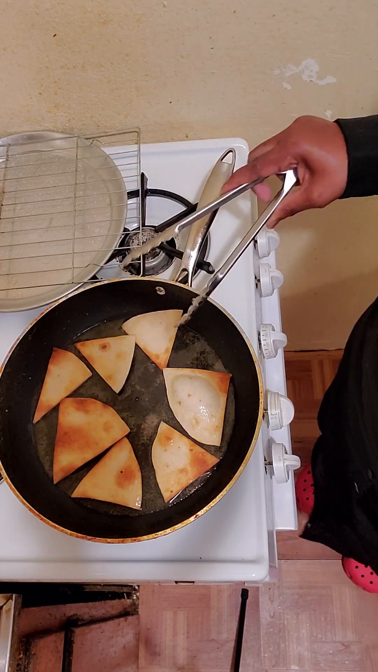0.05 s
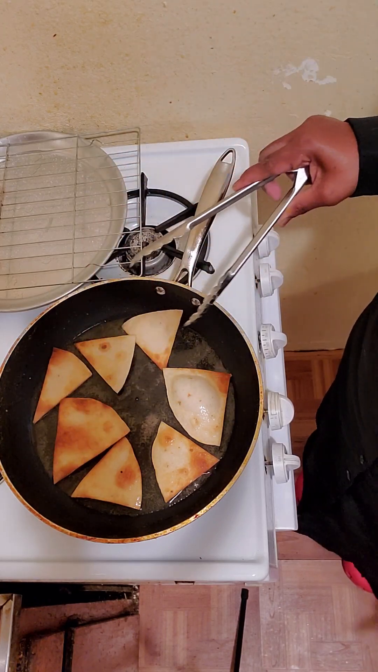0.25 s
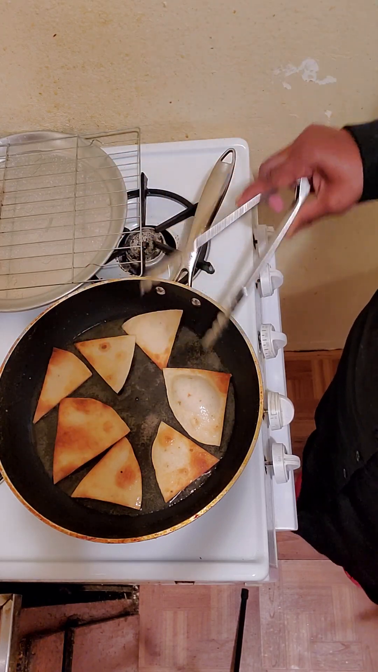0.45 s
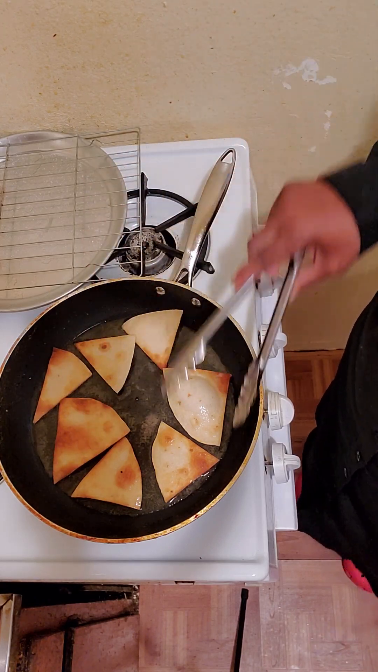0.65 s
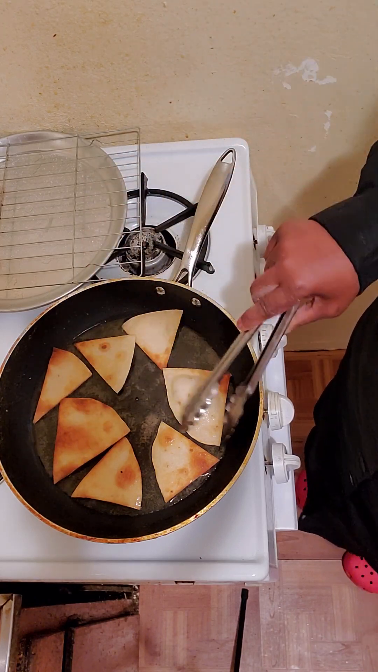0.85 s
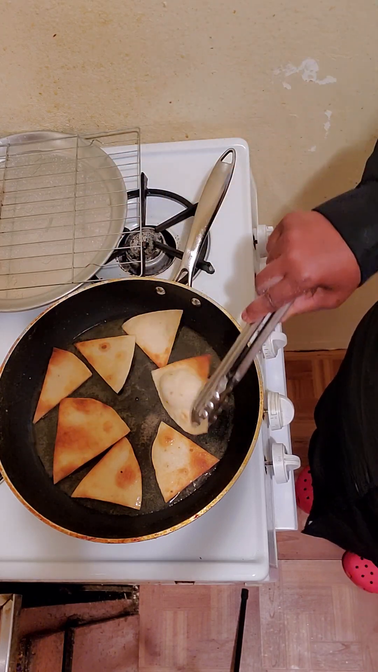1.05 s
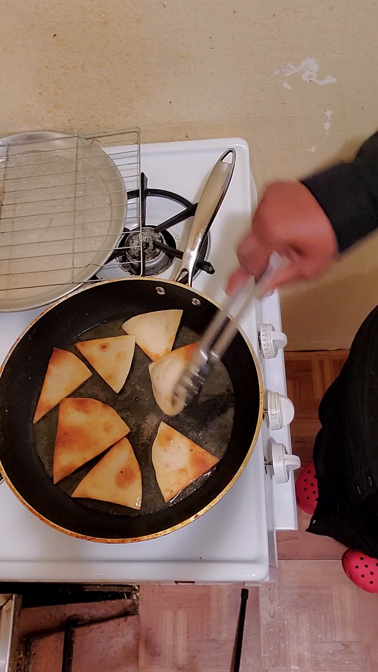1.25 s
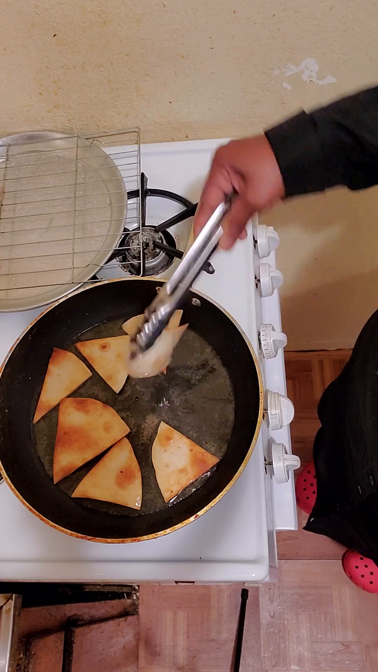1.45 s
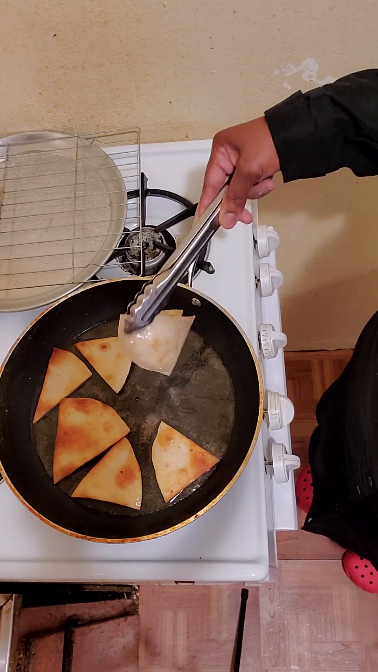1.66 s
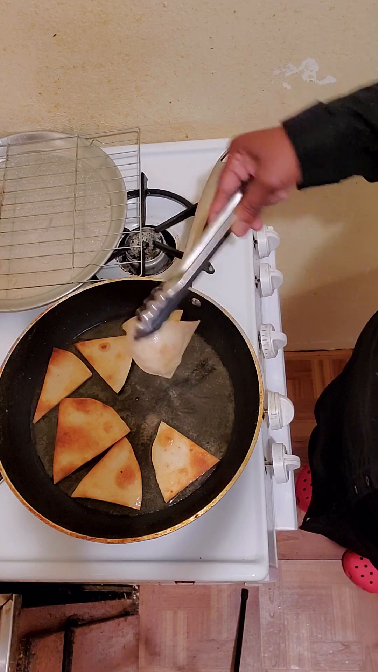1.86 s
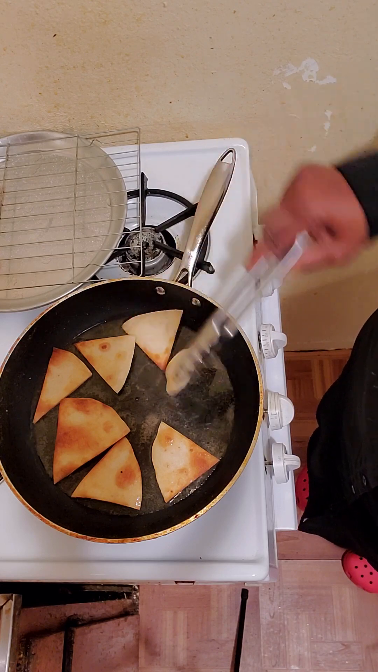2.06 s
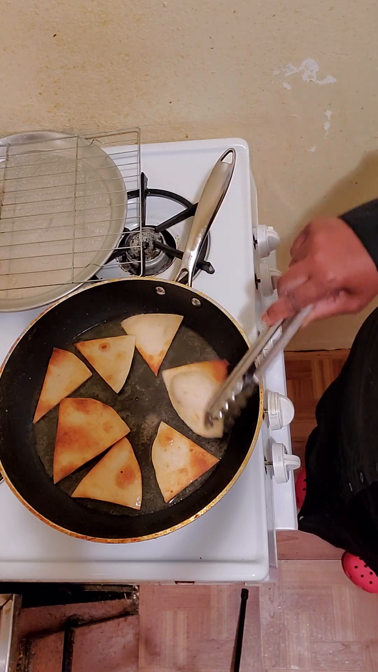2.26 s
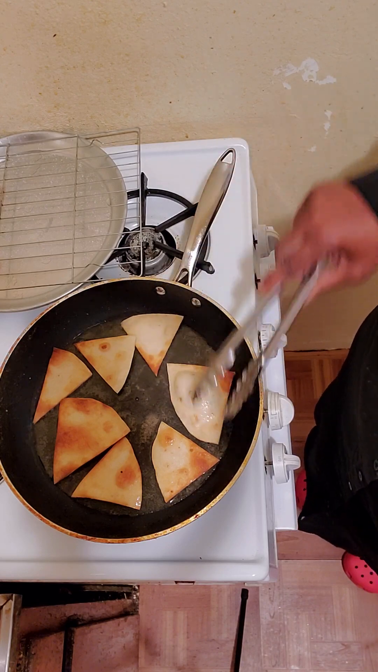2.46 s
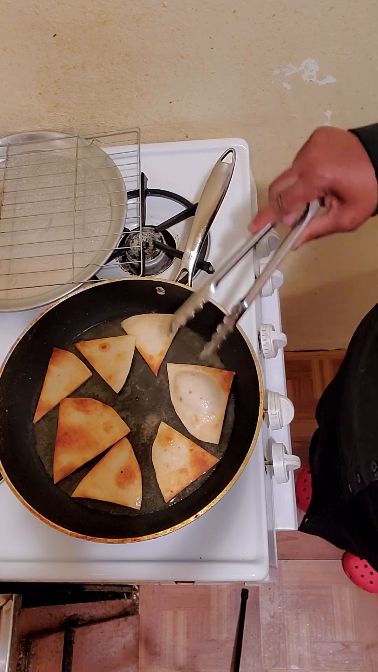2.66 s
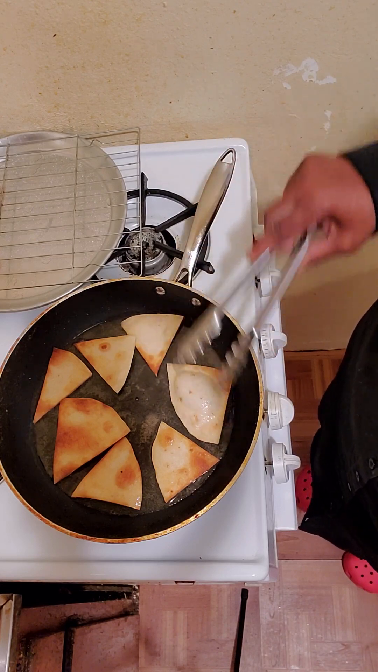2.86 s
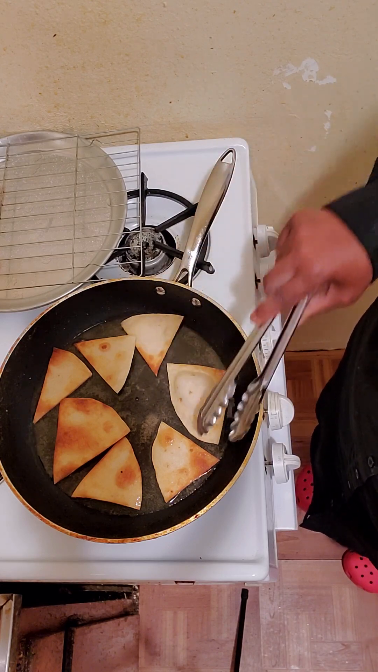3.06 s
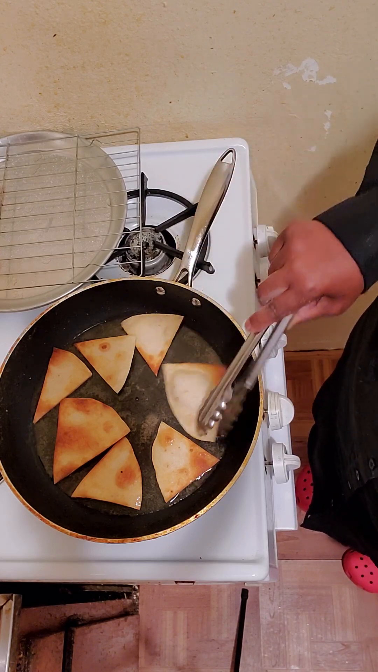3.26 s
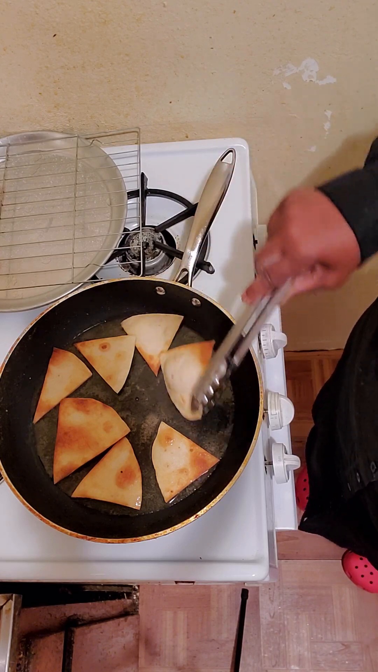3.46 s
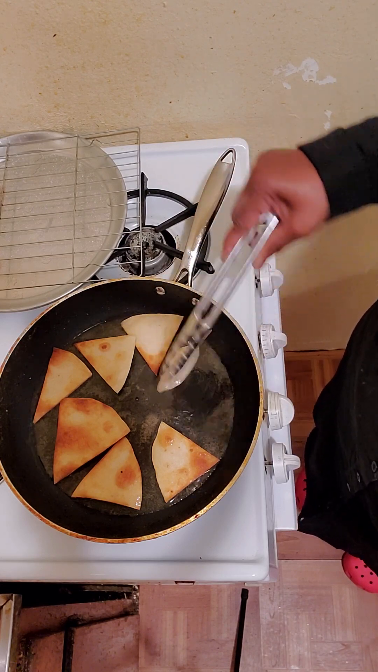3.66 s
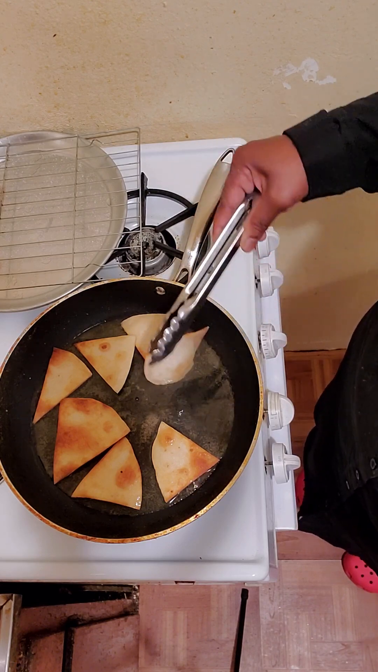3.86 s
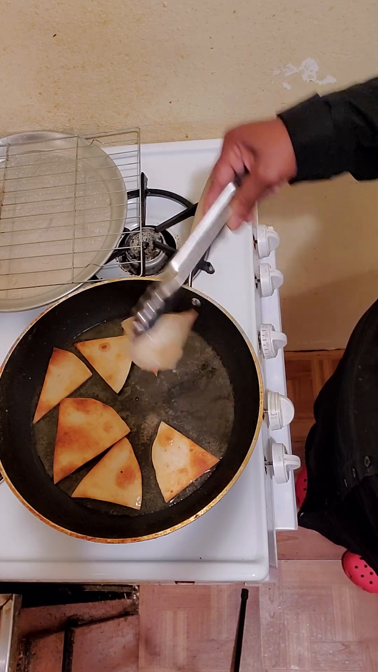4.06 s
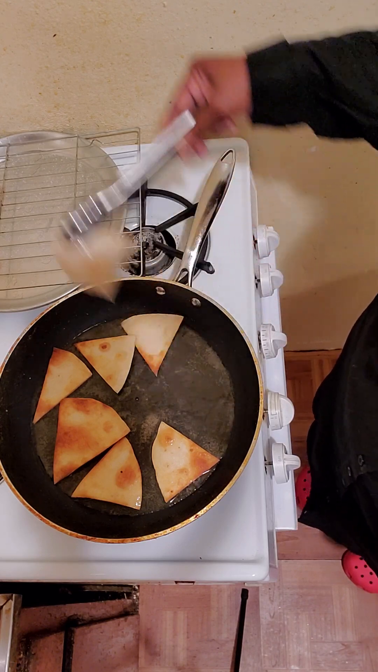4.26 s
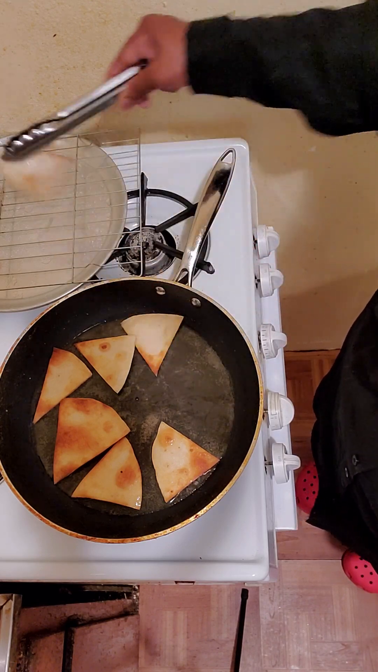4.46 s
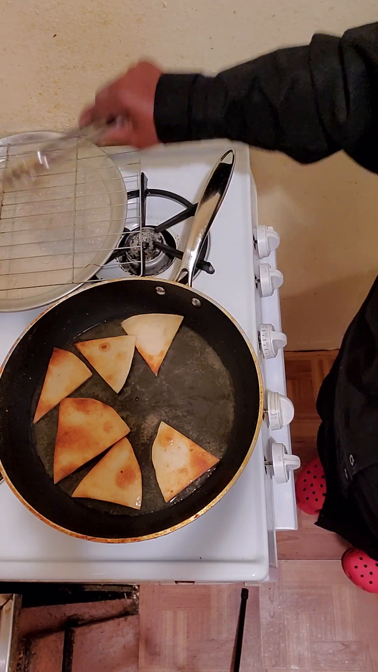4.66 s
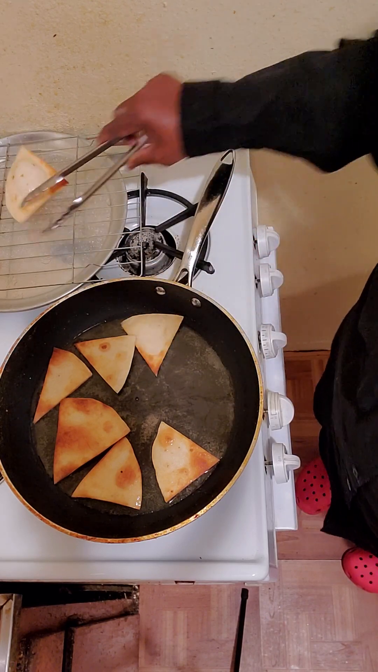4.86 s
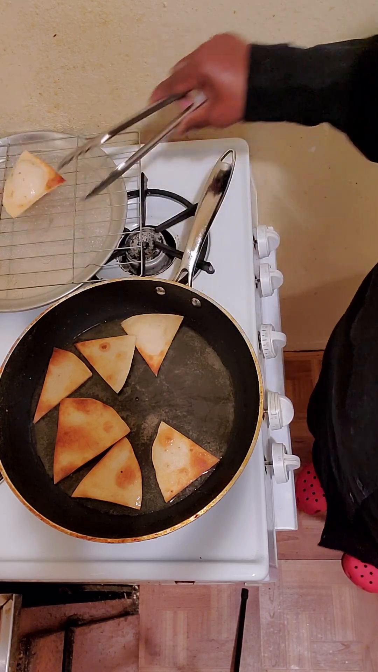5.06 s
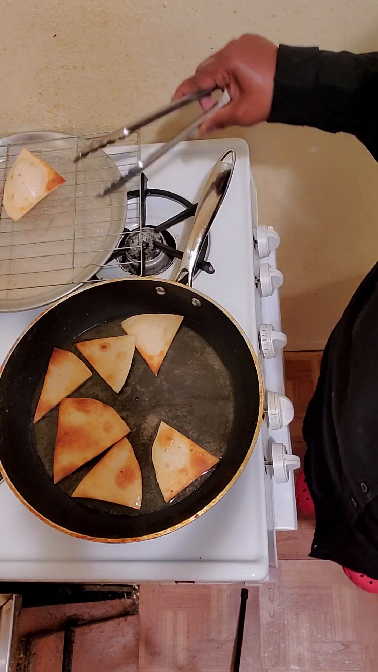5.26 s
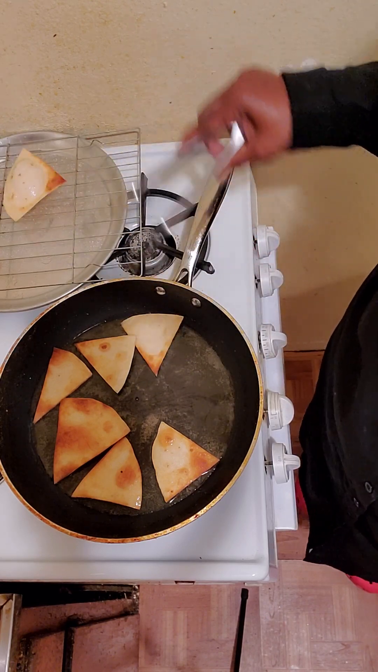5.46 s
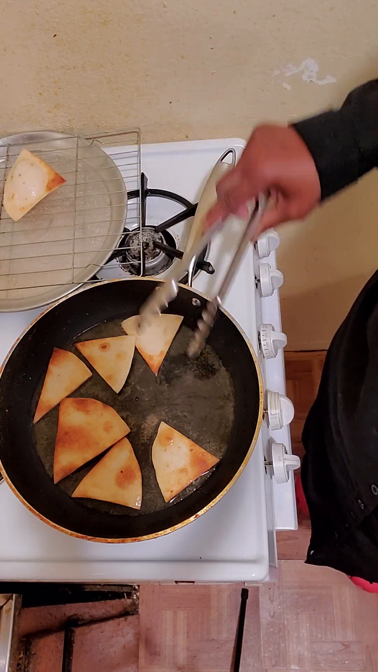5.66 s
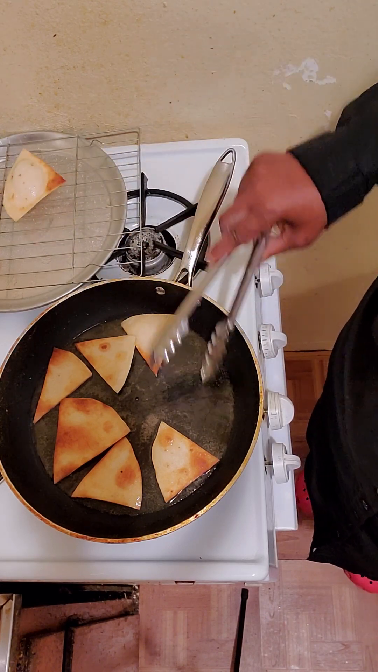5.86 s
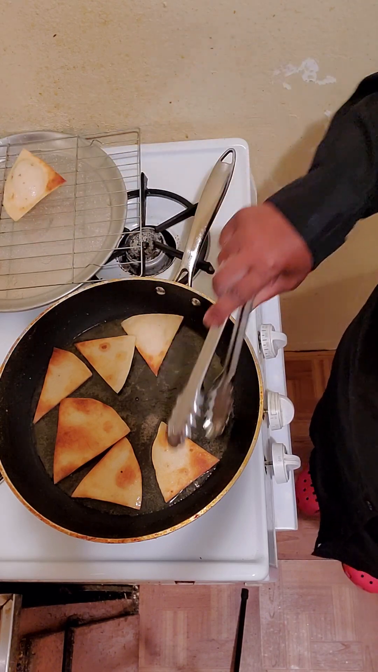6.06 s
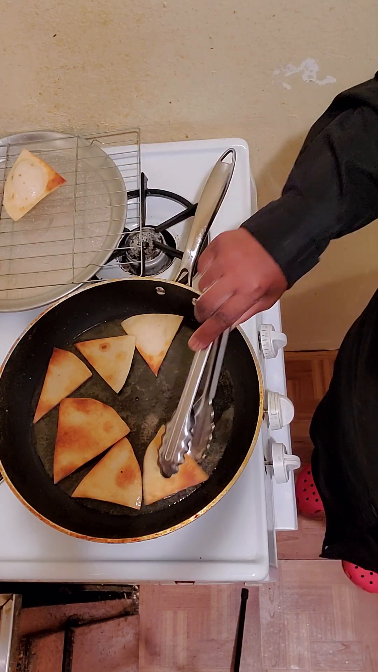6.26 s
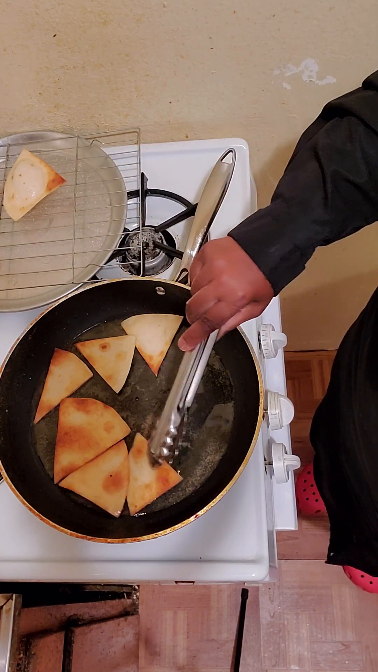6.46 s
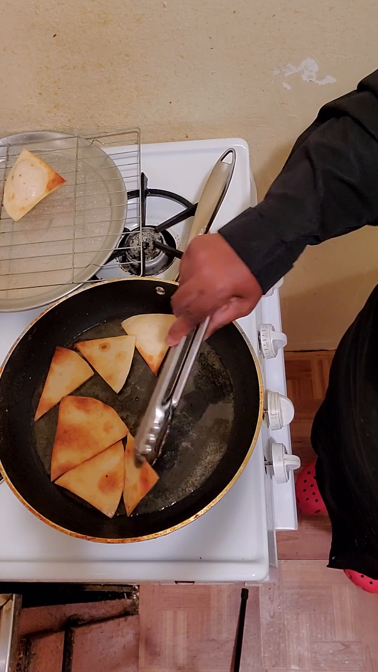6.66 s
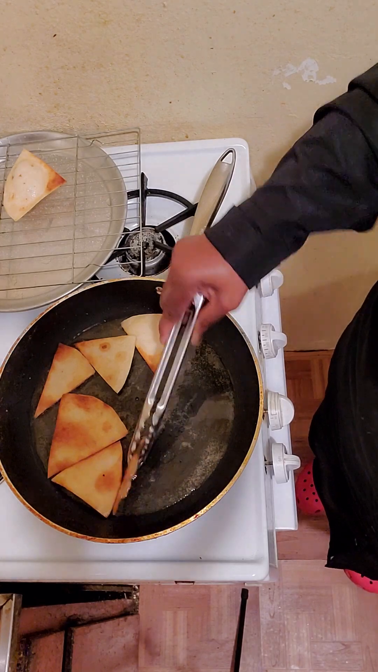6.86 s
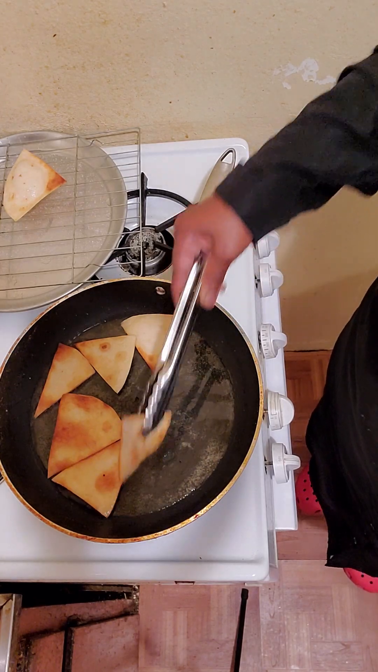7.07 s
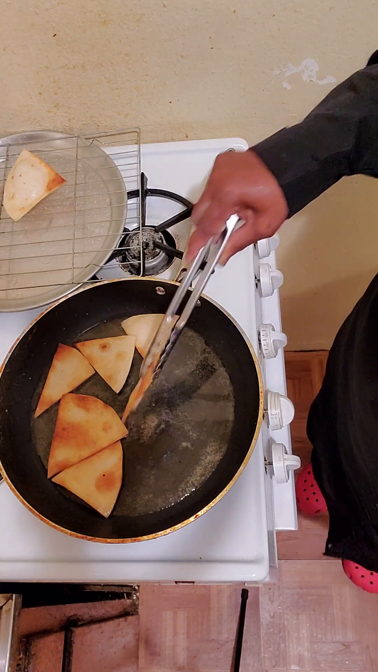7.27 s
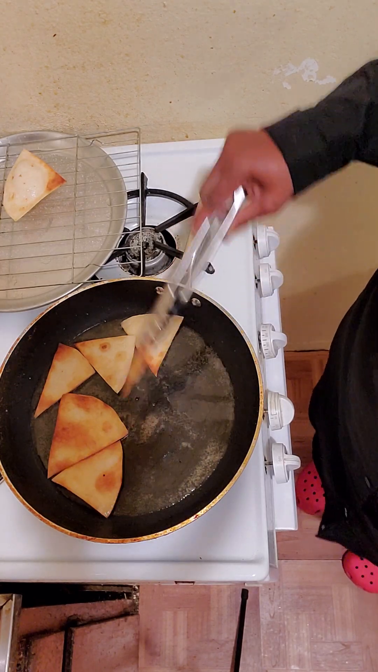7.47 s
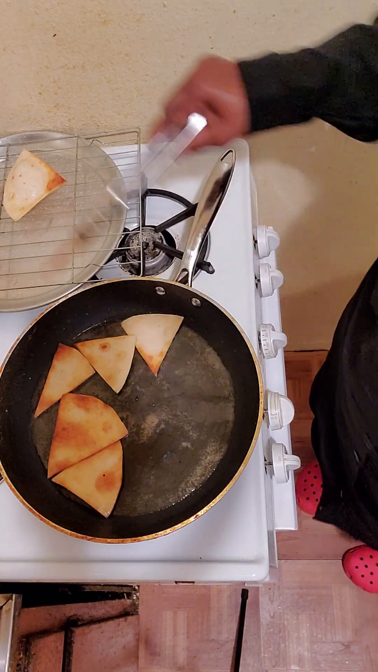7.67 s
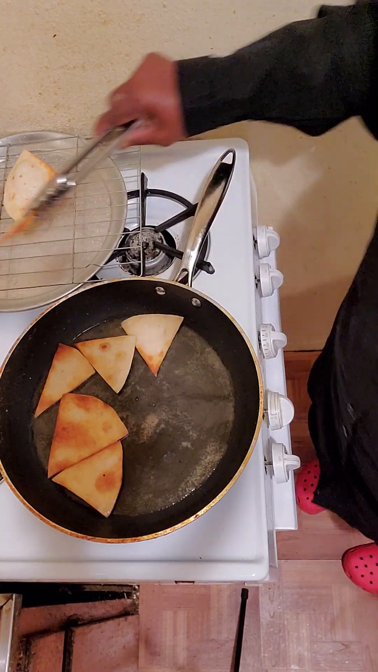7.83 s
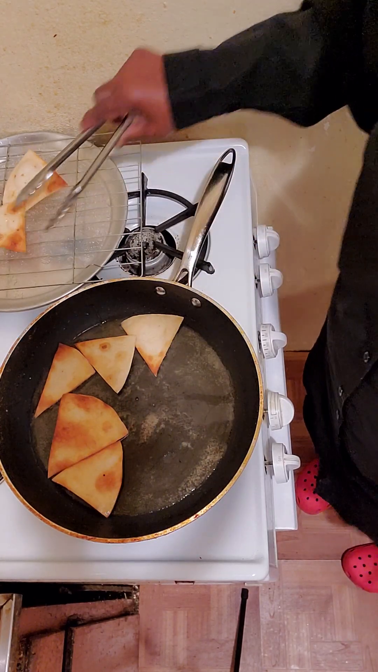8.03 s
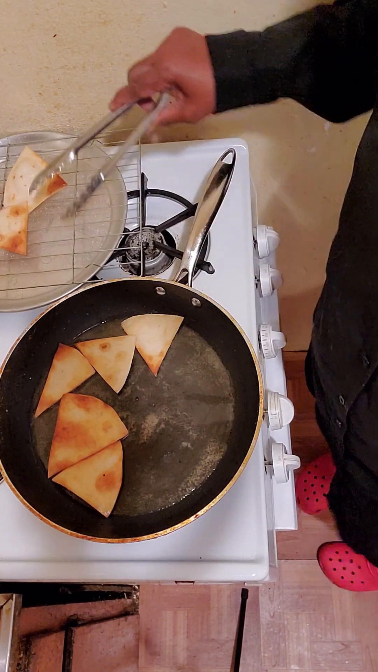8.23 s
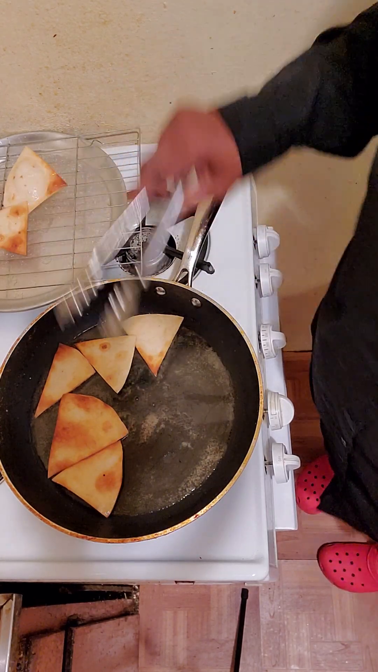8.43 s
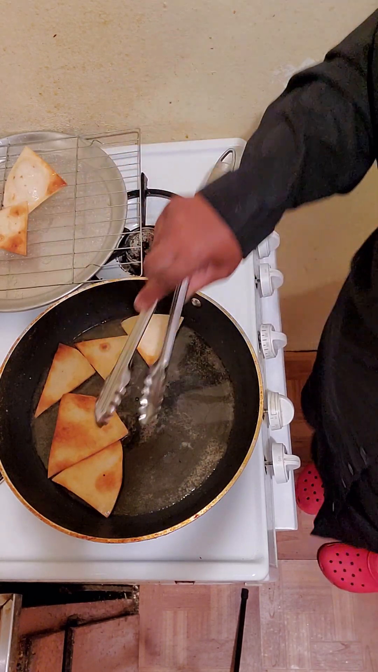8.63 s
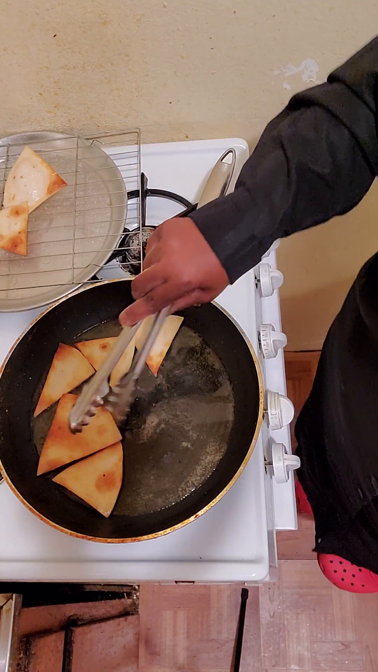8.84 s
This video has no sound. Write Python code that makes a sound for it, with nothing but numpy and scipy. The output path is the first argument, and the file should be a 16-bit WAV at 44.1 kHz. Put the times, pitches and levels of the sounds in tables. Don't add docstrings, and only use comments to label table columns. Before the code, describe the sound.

Metal tongs tap a ringing frying pan over a faint oil fizz, then crisp food lands with a rattle on a wire rack.

```python
import sys
import numpy as np
from scipy import signal
from scipy.fft import rfft, irfft, next_fast_len
from scipy.io import wavfile
from scipy.ndimage import uniform_filter1d

SR = 44100
rng = np.random.default_rng(int(sys.argv[2]) if len(sys.argv) > 2 else 0)


def convert_level_to_amplitude(level_db):
    exponent = np.asarray(level_db, float) / 20
    return 10 ** exponent


def file_out(sig):
    cols = np.atleast_2d(sig).T
    lim = np.clip(cols, -1, 1)
    pcm = np.round(lim * 32767).astype(np.int16)
    wavfile.write(sys.argv[1], SR, pcm)


N = 392487
RING = 2 ** 14


def level(x, db):
    return x * convert_level_to_amplitude(db) / np.sqrt(np.mean(x ** 2))


def early(x):
    return x / np.sqrt(np.mean(x[..., :512] ** 2))


def read(table, hz):
    table_hz, value = np.transpose(table)
    return np.interp(np.log(np.maximum(hz, 1)), np.log(table_hz), value)


def colour(x, table, tilt_db=0):
    size = next_fast_len(x.shape[-1])
    hz = np.fft.rfftfreq(size, 1 / SR)
    gain_db = read(table, hz) + tilt_db * np.log2(np.maximum(hz, 500) / 4000)
    return irfft(rfft(x, size) * convert_level_to_amplitude(gain_db), size)[..., :x.shape[-1]]


def noise(size):
    return rng.standard_normal((2, size))


def fade(t60, size=RING):
    return 1000. ** (-np.arange(size) / SR / np.maximum(t60, .005))


def walk(rate):
    hold = int(SR / rate)
    steps = np.repeat(rng.standard_normal(N // hold + 1), hold)
    return 1.3 * uniform_filter1d(uniform_filter1d(steps, hold), hold)[:N]


def ring(hz, db, t60, choke_s, size=RING, waver=0, slow_hz=20000):
    hz, db, t60 = (np.asarray(v)[:, None] for v in (hz, db, t60))
    start, off = rng.random((2, len(hz)))
    side_start = start + .25 * np.sign(off - .5) + .1 * np.sin(40 * off)
    turn = np.exp(2j * np.pi * np.array([start, side_start])) * convert_level_to_amplitude(db.T)
    t = np.arange(size) / SR
    choke = 0.084 + np.exp(-(t / choke_s) ** 2 * (hz / 4000))
    build = 1 - np.exp(-hz * np.maximum(hz / slow_hz, 1) * t / 5)
    modes = np.exp((2j * np.pi * hz - np.log(1000) / t60) * t) * build * choke
    if waver:
        beat = 2 * np.pi * 29.42 * (.5 + off[:, None]) * t
        modes = modes * (1 - waver * np.sin(beat / 2 + np.sin(beat / 3)) ** 2)
    return np.pad((turn @ modes).imag, ((0, 0), (0, RING - size)))


def strike(body, contact_ms, clash_db, clash_t60, clash, tilt_db=0):
    build = 1 - np.exp(-np.arange(RING) / SR * 1000 / max(contact_ms, .1))
    grain = convert_level_to_amplitude(uniform_filter1d(rng.standard_normal(RING), size=40) * 9.0)
    blur = colour(noise(RING) * fade(clash_t60) * grain * build, clash, tilt_db)
    return np.array([early(body * build), convert_level_to_amplitude(clash_db) * early(blur)])


def add(track, s, sound, db):
    i = int(s * SR)
    track[..., i:i + RING] += (early(sound) * convert_level_to_amplitude(db - 12))[..., :N - i]


# start in seconds, peak level in dB,
# time until food and hand choke the ring in seconds, hardness as a tilt in dB per octave.
TAPS = [
    (0.943, -18.5, 0.26, 0.5),
    (2.496, -9.5, 0.055, 1.5),
    (3.224, -22, 0.24, 1),
    (6.187, -17, 0.041, 6.5),
    (8.829, -22.5, 0.086, -5.5),
]
# pitch in Hz, level in dB, t60 in seconds.
PAN_MODES = [
    [(328, -21.5, 0.38), (542, -0.5, 0.22), (860, -18, 1), (981.2, -7.5, 0.575), (1267, -15, 0.13),
     (1441.5, -18.5, 0.68), (1847, -5, 0.082), (2064, -9, 0.176), (2224, -3.5, 0.088), (2557, -2, 0.148),
     (2588.4, -0.5, 0.097)],
    [(323.1, -12, 0.141), (561, -1, 0.135), (888, -24.5, 0.54), (1007, -1, 0.0694), (1267, -16, 0.15),
     (1585, -1.5, 0.044), (1978, -14.5, 0.047), (2200, -18.5, 0.167), (2400, -24, 0.23), (2503, -12, 0.156),
     (2570, -12.5, 0.117)],
    [(369.5, -17.5, 0.25), (541, -11.5, 0.51), (986, -8, 0.36), (866.3, -7.5, 0.378), (1298, -2, 0.134),
     (1418, -11, 0.223), (1639.6, 5, 0.137), (2110, -1, 0.086), (2304, -9.5, 0.13), (2570, -7.5, 0.286)],
    [(329.2, 4.5, 0.1244), (972.7, 2.5, 0.1015), (1110.5, -20.5, 0.5), (1713, -21, 0.47),
     (1966, -10.5, 0.095), (2185, -6.5, 0.112), (2280, -2, 0.074), (2595, -19.5, 0.17)],
    [(337.8, -19, 0.276), (565.6, -1, 0.1065), (938.3, 2.5, 0.105), (991, -3, 0.076), (1073, -15, 0.111),
     (1440, -45, 2.0), (1640, -31.5, 0.092), (1825, -42.5, 5.0), (2157, -19, 0.132)],
]
# pitch in Hz, level in dB, t60 in seconds.
TONGS_MODES = [
    [(2866, 1, 0.113), (2900, -22, 0.58), (3400, -15.5, 0.43), (4183, -10, 0.12), (4200, -8.5, 0.125),
     (4450, -7, 0.1), (4755, 0, 0.085), (5070, -5, 0.215), (5846, -13, 0.34), (5620, 3.5, 0.044),
     (6300, 1, 0.071), (6860, -6.5, 0.078), (5130, -6, 0.18), (7590, -4.5, 0.055)],
    [(2917, -5, 0.0695), (3080, -18, 0.19), (3440, -16, 0.25), (3900, -16, 0.174), (4178, -5, 0.096),
     (4734, -5.5, 0.103), (4840, -16.5, 0.3), (5160, -16, 0.207), (5290, -11, 0.107), (5816, -13.5, 0.216),
     (6148, -9, 0.065), (6450, -10.5, 0.087), (6750, -4, 0.052), (7420, -10, 0.055)],
    [(2880, -2.5, 0.162), (3036, -1.5, 0.082), (3460, -12, 0.187), (4247, -4.5, 0.1), (4470, -17, 0.11),
     (4900, -17, 0.156), (5020, -13.5, 0.52), (5250, -12, 0.296), (5766, -7.5, 0.155), (6046, 1.5, 0.081),
     (6390, -16, 0.195), (6790, -0.5, 0.082), (7460, -5, 0.041), (8000, -26, 0.2)],
    [(2929, -2.5, 0.082), (3100, 5.5, 0.036), (3290, -2.5, 0.11), (4000, -7.5, 0.077), (4398, -12.5, 0.061),
     (5014, -4.5, 0.155), (5380, -4.5, 0.094), (5440, -13.5, 0.2), (6290, -7, 0.134), (5850, -15.5, 0.14),
     (6434, -3.5, 0.126), (6920, -9, 0.115), (7480, 3, 0.069), (7740, -10.5, 0.05)],
    [(3023, -2.5, 0.082), (3703, -6, 0.083), (4270, -4, 0.11), (4530, -7, 0.095), (4940, -14, 0.2),
     (5740, -13, 0.126), (6330, -16.5, 0.16), (6860, -32.5, 0.31), (6993, -35, 5.0), (7500, -33.5, 0.75)],
]
TONGS_DB = [0, 0.5, 2.5, 8, -11.5]
# frequency in Hz, level in dB per Hz.
PAN_CLASH = [(150, -27), (300, -14), (1000, -14.5), (1800, -8), (3000, -4.5), (5500, -7.5), (7500, -13),
             (8300, -14), (9200, -35), (10500, -24.5), (11600, -15), (16000, -30)]


def pan_taps():
    out = np.zeros((2, 2, N))
    for (s, db, choke_s, tilt_db), base, tongs, tongs_db in zip(TAPS, PAN_MODES, TONGS_MODES, TONGS_DB):
        arms = [(f, f_db + tongs_db, ring_s) for f, f_db, ring_s in tongs]
        hz, mode_db, t60 = np.transpose(base + arms)
        body = ring(hz, mode_db, np.minimum(t60, 0.82), choke_s, waver=0.541, slow_hz=1110)
        clash_db = -7 + 0.65 * tilt_db
        add(out, s, strike(body, 0.87, clash_db, 0.0267, PAN_CLASH, tilt_db), db)
    return out


# start in seconds, peak level in dB, pitch in
# Hz, t60 in seconds, clash level in dB.
TOUCHES = [(1.02, -38, 425.6, 0.033, -3), (1.172, -45.5, 1042, 0.038, -2.5),
           (1.276, -54, 4090, 0.0205, -1.5), (1.276, -43, 13450, .07, -17), (1.35, -48, 1015, 0.082, -2),
           (1.463, -49.5, 6300, .05, 10.5), (2.243, -48, 1087, 0.044, -7.5), (3.30, -42, 5120, 0.26, -1),
           (3.30, -45.5, 4290, 0.16, -9.5), (3.335, -48, 2847, 0.163, -3.5), (3.325, -41, 560, 0.062, -5.5),
           (3.367, -37, 355.8, 0.051, -11.5), (3.455, -43.5, 4270, 0.3, -1.5),
           (3.49, -47, 4270, 0.18, -7.5), (3.49, -44.5, 1010, 0.036, -3), (4.345, -53.5, 966.4, 0.48, -2),
           (4.70, -56, 1381, 0.37, -13), (5.15, -41.5, 490, 0.032, -9.5), (6.53, -49, 3515, 0.049, 4),
           (6.617, -46.5, 2675, 0.047, 5), (6.672, -55.5, 1557, 0.21, -13), (6.898, -50.5, 2774, .04, 6.5),
           (2.515, -20.5, 4233, 0.092, -20), (2.579, -43, 4220, 0.062, -11.5),
           (3.243, -32.5, 2110, 0.064, -3.5), (3.244, -43.5, 5130, .15, -1.5),
           (3.277, -44, 5855, 0.21, -9.5), (4.998, -42, 1271, 0.135, -14), (8.147, -28, 1268, 0.158, -16),
           (8.164, -25, 1260, 0.147, -8)]


def light_touches():
    out = np.zeros((2, 2, N))
    for s, db, touch_hz, t60, clash_db in TOUCHES:
        body = ring([touch_hz], [0], [t60], 0.062, size=RING // 2)
        add(out, s, strike(body, 0.75, clash_db, 0.125, PAN_CLASH), db)
    return out


# frequency in Hz, level in dB per Hz.
GRATE = [(130, -35), (220, -3.5), (350, -1.5), (600, -14), (900, -2), (1500, -32.5)]


def grate():
    out = np.zeros((2, 2, N))
    for s, db, *_ in TAPS:
        body = ring([260], [0], [.1], .05)
        add(out, s, strike(body, 7.75, 12.6, 0.1696, GRATE), db - 22.5)
    return out


def wire_octaves(hz):
    return np.log2(np.clip(hz, 3290, 8240) / 3290)


# start in seconds, peak level in dB, plate thud against it in dB,
# tilt in dB per octave, pitch of the wire struck in Hz.
KNOCKS = [(4.9463, -24.5, -15, -5, 7480), (4.976, -29.5, -14.5, 2.5, 5750), (4.982, -19.5, -25, -5.5, 3860),
          (4.9949, -21.5, -16.5, -5.5, 3600), (5.006, -32, -7.5, -9, 3700), (5.0229, -32, -7.5, -17, 3900),
          (5.042, -42.5, -15, -15.5, 3100), (5.0875, -38, -7.5, -10, 5750),
          (5.1897, -32, -14.5, -6.5, 7480), (5.194, -35.5, -16, -12, 3400), (5.2117, -47.5, -1.5, -2, 7480),
          (5.2683, -43.5, -8.5, -12.5, 3460), (8.105, -23.5, -8.5, -2, 7460),
          (8.1254, -21.5, -37, -6, 6600), (8.130, -9, -24.5, 1.5, 5750), (8.1334, -5.5, -21.5, 2, 7460),
          (8.138, -19.5, -19, 10, 6600), (8.1457, -13.5, -17, -6, 5750), (8.153, -21.5, -15, 2.5, 7400),
          (8.1632, -20, -11, -7, 3500), (8.1776, -12, -33, -4.5, 6540), (8.186, -23, -5.5, -2, 3900),
          (8.198, -25.5, -19, -14.5, 5750), (8.204, -21, -19.5, -8.5, 7460), (8.23, -19, -15.5, -3.5, 6570),
          (8.2733, -21, -25, -5, 5750), (8.3182, -29.5, -2, -8, 6600), (8.3674, -21.5, -16.5, -2, 6870),
          (8.399, -31.5, -33.5, -5, 5750), (8.4834, -34, -32.5, -4.5, 7460),
          (8.519, -34.5, -20.5, -4.5, 7460), (8.576, -42, -30.5, -7, 7377)]
# pitch in Hz, level in dB, t60 in seconds.
RACK_MODES = [(1815.3, -17, 0.384), (1999, -11, 0.216), (2300.3, -9.5, 0.254), (2469, -13.5, 0.195),
              (2896, -12.5, 0.21), (3080, -3.5, 0.168), (3488, -8.5, 0.099), (3400, -0.5, 0.093),
              (3594, -6, 0.095), (3714, -4, 0.105), (4055, -5, 0.117), (4220, -11, 0.102),
              (5050, -3, 0.054), (5450, -14, .07),
              (5584, -3, 0.067), (5830, -4.5, 0.074), (6670, 3.5, 0.088), (6850, -1.5, 0.055),
               (7342, 2, 0.061), (5745, 4.5, 0.09), (7470, 8.5, 0.0455), (8120, -7, 0.1),
               (7800, -14.5, 0.091), (11470, -5.5, 0.12), (12620, -4.5, 0.085), (5915, -8.5, 0.078),
               (13400, -10, 0.063), (14800, -1.5, 0.07)]
# frequency in Hz, level in dB per Hz.
RACK_CLASH = [(900, -24), (1300, -10.5), (1700, -19.5), (2100, -15.5), (2650, -11.5), (3100, -10),
              (3900, -6), (4500, -11), (5000, -5), (5350, -8.5), (5750, -11), (6200, -4.5), (6650, -7),
              (7050, -8.5), (7450, -15), (8200, -9), (8700, -28.5), (9500, -27), (10700, -19.5),
              (11700, -11), (16000, -8.5)]
# pitch in Hz, level in dB, t60 in seconds.
PLATE_MODES = [(220.8, -2.5, 0.051), (267.8, 2, 0.1295), (353.5, -3.5, 0.218), (582.9, -8.5, 0.25),
               (923, -8.5, 0.52), (1024.7, -9.5, 0.204), (1291, -13, 0.39), (1351, -11.5, 0.18)]
# frequency in Hz, level in dB per Hz.
THUD = [(120, -18), (200, 4), (300, -3), (500, -5.5), (1000, -16.5), (1400, -12.5), (2000, -23)]


def rack():
    out = np.zeros((2, 2, N))
    hz, wire_db, t60 = np.transpose(RACK_MODES)
    plate = ring(*np.transpose(PLATE_MODES), 0.1)
    before = 0
    for s, db, thud_db, tilt_db, struck_hz in KNOCKS:
        bend, mix = rng.standard_normal((2, len(hz)))
        struck_db = 3.5 * np.exp(-(np.log2(hz / struck_hz) / 0.084) ** 2)
        mode_db = wire_db + 1.63 * mix + struck_db + tilt_db * wire_octaves(hz)
        wires = ring(hz * (1 + 0.00271 * bend), mode_db, t60, 0.46, size=RING // 2)
        clash = [(f, f_db + tilt_db * wire_octaves(f)) for f, f_db in RACK_CLASH]
        clash_db = -5.5 + 3 * np.exp(-(s - before) / 0.138)
        contact_ms = 0.43 * 2 ** (-db / 48)
        add(out, s, strike(wires, contact_ms, clash_db, 0.176, clash), db)
        add(out, s, strike(plate, 1.9, 4.55, 0.229, THUD), db + thud_db)
        before = s
    return out


# start in seconds, peak level in dB.
PLATE_TAPS = [
    (8.317, -27.5),
    (8.444, -37),
]
# pitch in Hz, level in dB, t60 in seconds.
RIM = [(354, -10.5, 0.103), (560, 7, 0.059), (897, -3, 0.145), (1230, 0, 0.086)]


def plate_rim():
    out = np.zeros((2, 2, N))
    for s, db in PLATE_TAPS:
        body = ring(*np.transpose(RIM), .04)
        add(out, s, strike(body, 1.0, -0.97, 0.085, GRATE), db)
    return out


# start in seconds, peak
# level in dB, pitch in Hz, t60 in seconds.
TICKS = [(1.135, -45.5, 1000, 0.083), (3.245, -36.5, 560, 0.227), (3.243, -35, 933, 0.13),
         (3.365, -44.5, 1630, 0.066), (3.37, -44.5, 1002, 0.22), (4.947, -32, 5745, 0.078),
         (4.947, -36, 3510, .1), (4.984, -36.5, 3600, 0.09), (4.998, -29, 3418, 0.092),
         (5.02, -35.5, 3810, .12), (5.088, -42, 5745, 0.077), (5.190, -33.5, 5700, .07),
         (5.193, -33.5, 3044, 0.107), (5.208, -39.5, 7470, 0.11), (5.035, -35.5, 2350, 0.146),
         (5.06, -47, 2400, 0.115), (5.212, -37, 3580, 0.083), (6.1875, -26, 5250, 0.106),
         (6.1875, -31, 6334, 0.136), (6.1875, -38.5, 2300, 0.072), (6.19, -39, 1650, 0.13),
         (8.110, -29, 7470, .1), (8.112, -29.5, 3700, .15), (8.127, -17.5, 6595, .1),
         (8.143, -20.5, 5670, 0.056), (8.24, -29.5, 3080, 0.206), (8.291, -26.5, 6570, 0.092),
         (8.302, -32.5, 5745, .08), (8.302, -30, 7470, 0.098), (8.399, -33, 3080, 0.24),
         (8.399, -33, 7470, 0.105), (8.467, -51.5, 7470, .2), (8.52, -40, 3080, 0.27),
         (8.486, -41, 4000, 0.11), (8.285, -36, 3600, 0.204), (8.31, -36, 3450, .15),
         (8.832, -33.5, 2170, 0.117)]


def ticks():
    out = np.zeros((2, N))
    for s, db, tick_hz, t60 in TICKS:
        add(out, s, ring([tick_hz], [0], [t60], 0.04, size=RING // 4), db)
    return out


# frequency in Hz, t60 in seconds.
ROOM_T60 = [(300, 0.592), (1200, 0.42), (4000, 0.323), (12000, 0.155)]


def kitchen(x):
    echo = np.zeros((2, RING))
    for hz, t60 in ROOM_T60:
        band = [(hz / 4, -40), (hz / 2, -3), (hz, 0), (hz * 2, -3), (hz * 4, -40)]
        echo = echo + colour(noise(RING), band) * fade(t60)
    tone = rfft(echo, 2 * RING)
    power = abs(tone) ** 2
    even = (uniform_filter1d(power, size=200) / power) ** .3
    echo = irfft(tone * even)[:, :RING] * (1 - fade(0.0216))
    return signal.fftconvolve(x[:1], level(echo, -6.5 - 10 * np.log10(RING)), axes=1)[:, :N]


# frequency in Hz, level in dB per Hz.
FIZZ = [(1060, -15.5), (1800, -3), (2390, -0.5), (2640, 0.5), (3710, 0.5), (5150, -1), (5800, 1),
        (7090, 0.5), (8060, -2.5), (9330, -12.5), (10600, -8.5), (12200, -0.5), (15100, 2), (16000, -6.5)]
# time in seconds, level in dB.
FRYING = [
    (0, -62.5),
    (3.599, -62.5),
    (5.499, -63),
    (8, -64.5),
    (8.9, -64),
]


def oil():
    s, db = np.transpose(FRYING)
    specks = 1 + 0.44 * convert_level_to_amplitude(4.3 * rng.exponential(size=N)) * (rng.random(N) < .02)
    flicker_db = .45 * walk(12) + .3 * walk(1.5)
    fizz = level(colour(noise(N) * specks, FIZZ), 5.62)
    return fizz * convert_level_to_amplitude(np.interp(np.arange(N) / SR, s, db) + flicker_db)


# frequency in Hz, level in dB per Hz.
RUMBLE = [(12, -34.5), (24, -24), (33, -4.5), (43, -3), (54, 2), (71, 2), (86, -6.5), (104, -8),
          (118, -40.5), (139, -39.5), (150, -36), (200, -48), (330, -120)]
# frequency in Hz, level in dB per Hz.
AIR = [(76, -52.5), (130, -11.5), (156, -14.5), (172, -6), (300, -11), (418, -8.5), (478, -17.5),
       (517, -7.5), (553, -17), (647, -9.5), (716, -15), (1000, -17.5), (1130, -17), (1270, -14.5),
       (1480, -20.5), (1900, -25.5), (2470, -60.5), (4180, -120)]
# pitch in Hz, wander in Hz, level in dB.
HUM = [(170.37, 5, -64.5), (218, 16, -70.5), (56.77, 1.8183, -56), (32.02, 1.98, -62)]


def background():
    out = level(colour(noise(N), RUMBLE), -52.5) * convert_level_to_amplitude(0.16 * walk(2.8))
    out += level(colour(noise(N), AIR), -59) * convert_level_to_amplitude(0.07 * walk(12.0))
    for hz, wander_hz, db in HUM:
        phase = 2 * np.pi * np.cumsum(hz + wander_hz * walk(5.0)) / SR
        out += level(np.sin(phase) * convert_level_to_amplitude(2.0 * walk(7.1)), db)
    return out


def ports(mid_side, width, lag=0):
    mid = mid_side[0]
    side = colour(mid_side[1], width)
    return np.array([mid + side, np.roll(mid - side, lag)])


# frequency in Hz, side minus mid in dB.
ROOM_WIDTH = [(60, -22), (110, -21.5), (200, -18), (380, -8.5), (700, -4), (1290, -0.5), (2380, -2.5),
              (4400, -0.5), (8120, 0.5), (15000, 0)]
# frequency in Hz, side minus mid in dB.
HIT_WIDTH = [(60, -17.5), (110, -27.5), (200, -11), (380, -10.5), (700, -13), (1290, -1.5), (2380, -4),
             (4400, 1.5), (8120, 2.5), (15000, -0.5)]


def scene():
    pan_lag, rack_lag = 3, 8
    taps = pan_taps() + light_touches() + grate()
    knocks = rack() + plate_rim()
    rings, clashes = taps + knocks
    echoes = kitchen(clashes + convert_level_to_amplitude(-11) * rings)
    near = ports(taps[0], HIT_WIDTH) + ports(taps[1] + echoes, HIT_WIDTH, pan_lag)
    near += ports(knocks.sum(axis=0), HIT_WIDTH, rack_lag)
    return near + ports(oil() + background(), ROOM_WIDTH) + ports(ticks(), HIT_WIDTH, rack_lag)


def band_limit(x):
    return signal.sosfilt(signal.butter(12, 15950, fs=SR, output="sos"), x)


# frequency in Hz, gain in dB.
TOP = [(15850, 0), (16000, -30), (16950, -70)]


def record(dry):
    ceiling = 1.1
    ahead = level(rng.standard_normal(1024) * fade(0.0297, size=1024), -12.5 - 10 * np.log10(1024))
    smear = signal.fftconvolve(dry, ahead[None, ::-1], axes=1)[:, 1023:]
    rounded = np.tanh(ceiling * (dry + smear)) / ceiling
    return band_limit(colour(rounded, TOP))


dry = scene()
out = record(dry)
file_out(out)
```